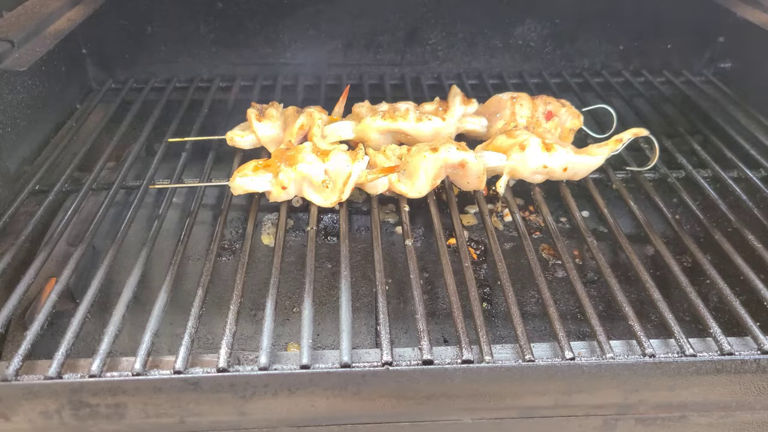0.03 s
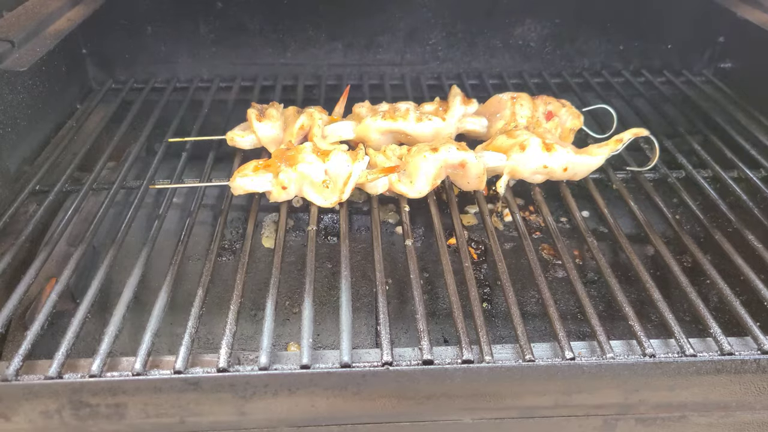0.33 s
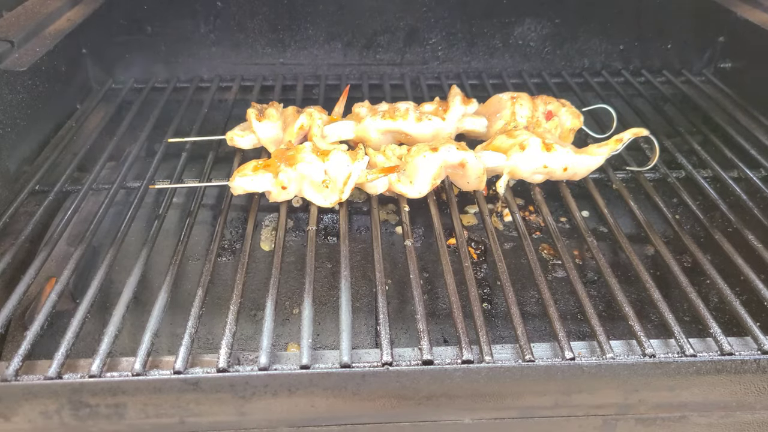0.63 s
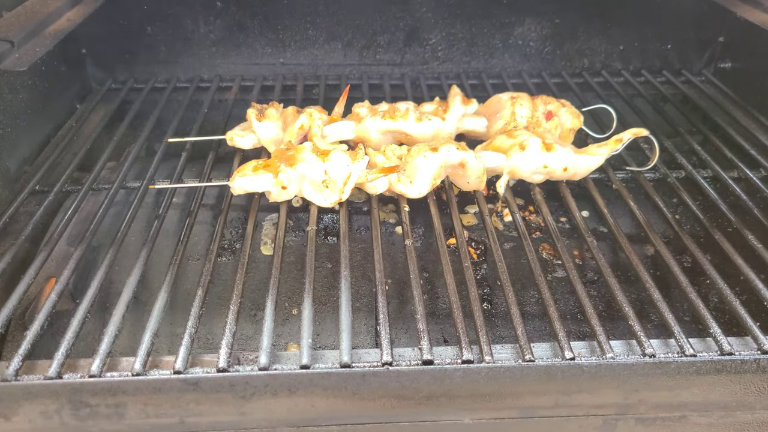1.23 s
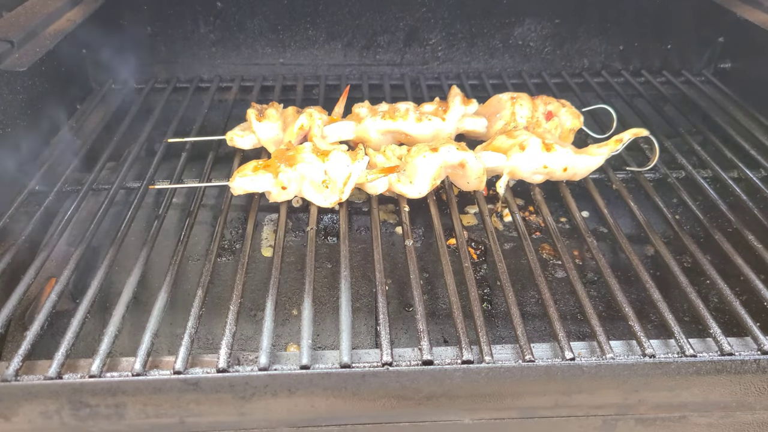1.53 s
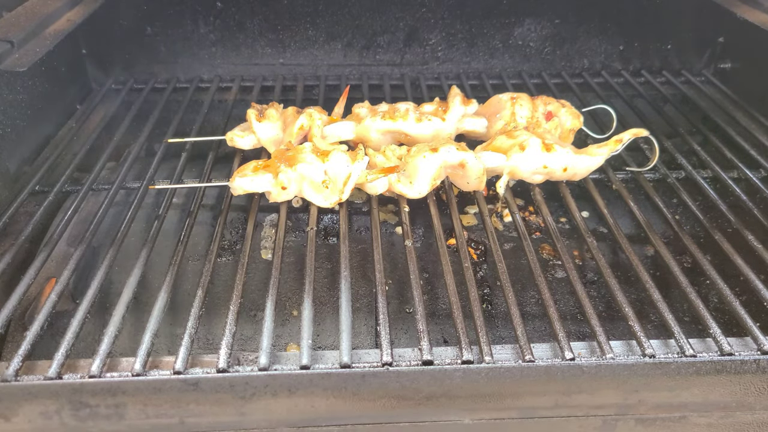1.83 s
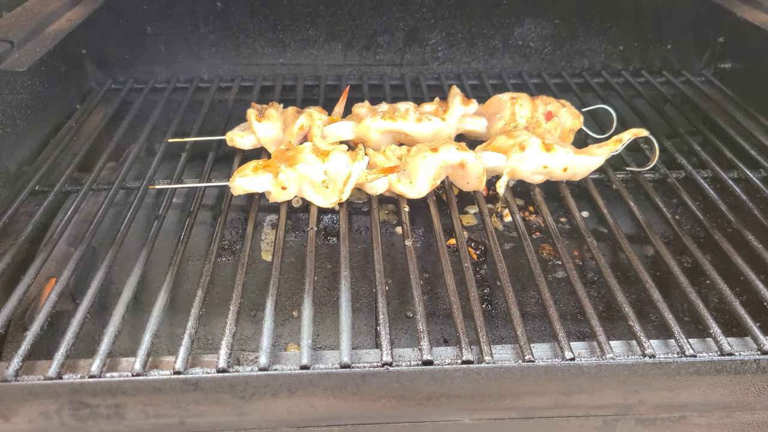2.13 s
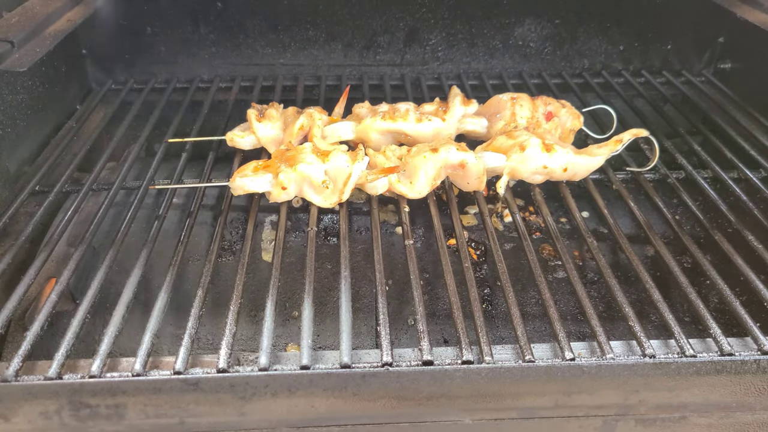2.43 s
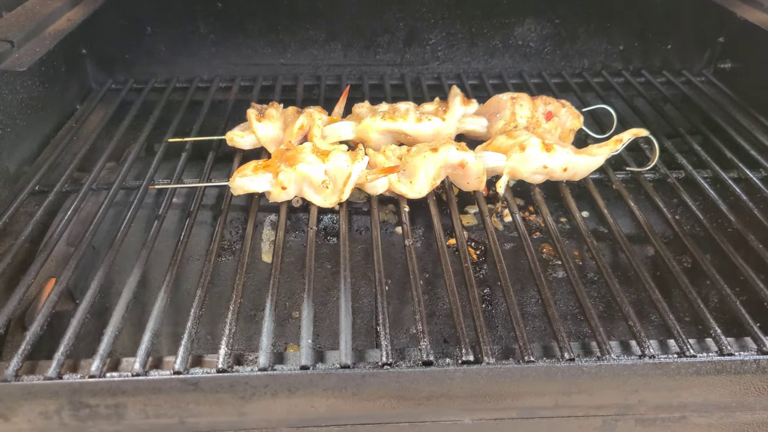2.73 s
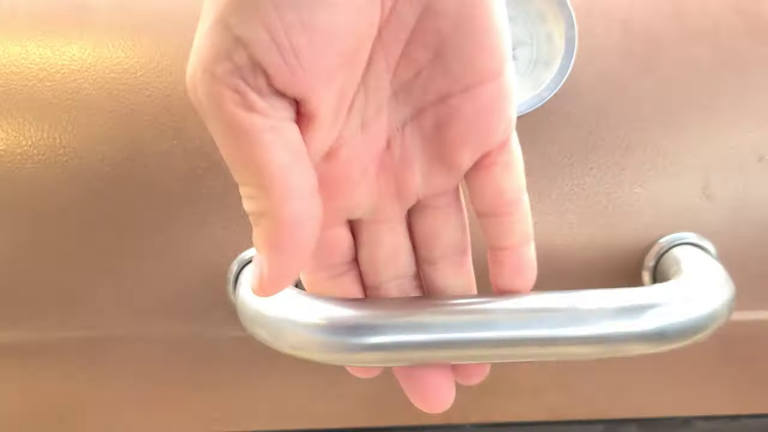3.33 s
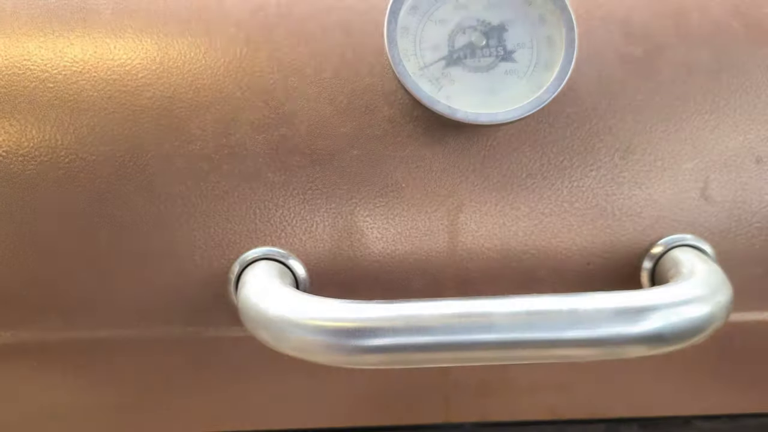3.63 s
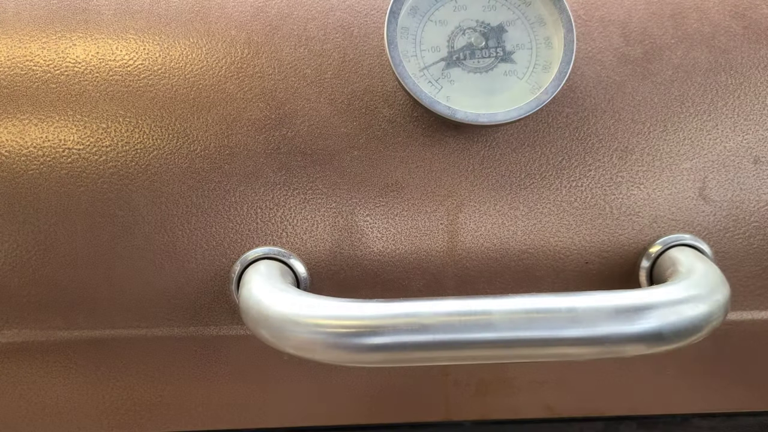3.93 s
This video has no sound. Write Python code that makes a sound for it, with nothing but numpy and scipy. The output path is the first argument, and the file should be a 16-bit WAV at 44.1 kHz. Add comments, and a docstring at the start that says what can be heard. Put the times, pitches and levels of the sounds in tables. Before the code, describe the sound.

Meat skewers sizzle and spit on an open grill, heard up close over the low, hollow roar of a fan-blown fire. Something knocks inside, then the steel lid shuts with a short rattling clang, muffling the sizzle.

```python
"""Skewers sizzling on an open barrel grill, heard from close by on a stereo microphone.
Juice boils in tiny bursting bubbles and fat spits; behind them the fan-blown fire roars in the
hollow body, something knocks inside and air buffets the microphone. The steel lid swings down,
muffling the sizzle and lowering the hollow note, then lands with a short rattling clang."""
import sys
import numpy as np
from scipy import signal
from scipy.fft import rfft, irfft
from scipy.io import wavfile

SR = 44100
rng = np.random.default_rng(int(sys.argv[2]) if len(sys.argv) > 2 else 0)


def wav_record(signal):
    """Record a signal, one row per channel, as 16-bit PCM in the file named by sys.argv[1]."""
    frames = np.transpose(np.atleast_2d(signal))
    bounded = np.clip(frames, -1, 1)
    # unit amplitude maps onto the largest positive 16-bit level
    quanta = np.round(bounded * 32767).astype(np.int16)
    wavfile.write(sys.argv[1], SR, quanta)


N = 176400
T = np.arange(N) / SR


def amp(db):
    """Decibels to gain."""
    return 10 ** (np.asarray(db) / 20)


def unit(x):
    """Scales to rms 1."""
    return x / np.sqrt(np.mean(abs(x) ** 2) + 1e-20)


def read(points, hz):
    """Reads a table on a log-frequency axis."""
    f, value = np.transpose(points)
    return np.interp(np.log(hz + 1), np.log(f + 1), value)


def curve(points):
    """Reads a control curve at every sample."""
    return np.interp(T, *np.transpose(points))


def add(mix, s, sound):
    """Mixes a sound into a stereo track at time s."""
    part = mix[:, round(s * SR):][:, :sound.shape[-1]]
    part += sound[..., :part.shape[1]]


def colour(x, points):
    """Gives a signal a spectrum, at rms 1."""
    size = x.shape[-1]
    gain = amp(read(points, np.fft.rfftfreq(size, 1 / SR)))
    return unit(irfft(rfft(x) * gain, size))


def drift(hz):
    """Slow random wander up to about hz, at rms 1."""
    f = np.fft.rfftfreq(N, 1 / SR)
    return unit(irfft(rfft(rng.standard_normal(N)) * (f > 0) * np.exp(-(f / hz) ** 2), N))


def resonate(x, hz, width):
    """A steep resonance that follows hz, at rms 1."""
    turn = np.exp(2j * np.pi * np.cumsum(hz * np.ones(N)) / SR)
    r = np.exp(-np.pi * abs(width) / SR)
    return unit((turn * signal.lfilter([(1 - r) ** 2], [1, -2 * r, r * r], x / turn)).real)


def chime(modes, t, spread_rad=.6):
    """Dying steel modes, each reaching left and right at slightly different phases."""
    return sum(amp(db - 60 * t / t60)
               * np.sin(2 * np.pi * (hz * t + rng.random()) + spread_rad * rng.standard_normal((2, 1)))
               for hz, db, t60 in modes)


# likeness of the two channels (frequency [Hz], likeness [ratio, clipped to 0-0.995 in use])
MIC_LIKENESS = [(60,0.5),(90,1),(115,2.8),(290,1.3),(400,0.73),(490,-0.4),(700,1.5),(1000,0.4),(1350,0.9),(1900,0.3245),(15000,0.14)]
# phase between them (frequency [Hz], left lead [rad])
MIC_LEAD = [(60,0),(200,.2),(430,.7),(700,.9),(1000,1.3),(1400,1.5),(2400,2),(16000,5)]
# their balance (frequency [Hz], left minus right [dB])
MIC_BALANCE = [(60,1.5),(300,0),(1290,0.9),(4400,0.5),(8120,2.5),(15000,7.5)]
def mic_noise(size):
    """White noise as the two microphone ports pick it up."""
    f = np.fft.rfftfreq(size, 1 / SR)
    left, other = rfft(rng.standard_normal((2, size)))
    same = np.clip(read(MIC_LIKENESS, f), 0, .995)
    side = amp(read(MIC_BALANCE, f) / 2)
    right = (same * left + np.sqrt(1 - same ** 2) * other) * np.exp(-1j * read(MIC_LEAD, f))
    return irfft(np.array([left * side, right / side]), size)


def band(size, hz, octaves):
    """Stereo noise around hz, at rms 1."""
    f = np.fft.rfftfreq(size, 1 / SR)
    bell = np.exp(-.5 * (np.log2((f + 1) / hz) / octaves) ** 2)
    return unit(irfft(rfft(mic_noise(size)) * bell, size))


# soft bumps on the microphone (time [s], level [dB], frequency [Hz])
BUMPS = [(.393,-14,105),(3.503,-16,87)]
def mic_bumps(width_s=.0091):
    """Each bump on the microphone is a single low swing of pressure."""
    return sum(amp(db) * np.sin(2 * np.pi * hz * (s - T)) * np.exp(-((T - s) / width_s) ** 2)
               for s, db, hz in BUMPS)


# puffs on the microphone (time [s], length [s], level [dB])
PUFFS = [(0.709,0.093,-26),(1.75,0.076,-21.5),(2.897,.08,-15),(3.467,0.053,-23),(3.718,0.051,-27.5)]
# rumble of air at the ports (frequency [Hz], relative density [dB])
RUMBLE_SPECTRUM = [(12,-35),(22,-5),(65,14),(115,6),(200,-10),(16000,-100)]
# its swell (time [s], level [dB])
RUMBLE_LEVEL = [(0,-29.5),(1.2,-34),(2.5,-23),(3.2,-32.5),(3.7,-39),(4,-35)]
def mic_buffets(puff_hz=80, left_db=1):
    """Air right on the microphone: low rumble and soft puffs, different at each port."""
    swell = sum(amp(db) * np.exp(-(2 * (T - s) / length) ** 2) for s, length, db in PUFFS)
    rumble = amp(curve(RUMBLE_LEVEL)) * colour(rng.standard_normal((2, N)), RUMBLE_SPECTRUM)
    puffs = swell * resonate(mic_noise(N), puff_hz, width=45)
    return (rumble + puffs) * amp([[left_db], [-left_db]])


# the fire behind the shut lid (frequency [Hz], relative density [dB])
DRONE_SPECTRUM = [(170,-16),(210,-3),(236,10.5),(265,-13),(325,-6.5),(360,4),(410,-13),(490,-3),(640,-11.5),(850,-7),(1100,-15),(1550,-13.5),(2000,-21.5),(16000,-43.5)]
# its rise as the lid shuts (time [s], level [dB])
DRONE_LEVEL = [(3.1,-54),(3.4,-38.5),(3.9,-37.5),(4,-32)]
def shut_drone():
    """Once the lid is down, the fire drones dully through the steel."""
    return amp(curve(DRONE_LEVEL)) * colour(mic_noise(N), DRONE_SPECTRUM)


# the hollow note, sinking as the lid comes down (time [s], share of open pitch [ratio])
HOLLOW_PITCH = [(0,0.89),(.6,1.085),(1.25,0.99),(1.47,1.015),(1.7,.96),(1.88,1.036),(2.25,1.04),(2.5,0.94),(2.8,1.02),(3,0.99),(3.1,.98),(3.33,0.78)]
# open barrel resonances (frequency [Hz], width [Hz], relative level [dB], following of the lid [0-1])
BARREL_MODES = [(180.1,57.7,-.5,1),(238.1,18,-6.5,0.1),(280.5,47,-13,0.28),(353.4,75,-14.5,0)]
# the fire's low roar (time [s], relative level [dB])
FIRE_LEVEL = [(0,-17),(.3,-26.5),(.55,-27),(.8,-28.5),(1.1,-20.5),(1.25,-19.5),(1.45,-17.5),(1.75,-16),(1.92,-17.5),(2.3,-18.5),(2.55,-13.5),(2.85,-16),(3.05,-16),(3.27,-18),(3.42,-35),(3.9,-51.5),(4,-29)]
def fire(gain_db=-.5, waver=.042, waver_hz=5):
    """Down in the barrel, flame turbulence booms in the hollow body's resonances."""
    bend = curve(HOLLOW_PITCH) - 1 + waver * drift(waver_hz)
    roar = sum(amp(db) * resonate(mic_noise(N), hz * (1 + follow * bend), width)
               for hz, width, db, follow in BARREL_MODES)
    return amp(gain_db + curve(FIRE_LEVEL)) * unit(roar)


# duct resonances, lid open (frequency [Hz], width [Hz], relative level [dB])
DUCT_MODES = [(391.9,41.7,4),(595,27,-11),(661,26,-12.5),(729,61,-14.5),(797,23,-12.5)]
# rush of fan air (frequency [Hz], relative density [dB])
RUSH_SPECTRUM = [(100,-14.5),(330,0.5),(490,-6),(680,-10),(1050,-6.5),(1350,2.5),(1700,-11.5),(2300,-17.5),(2900,-16),(4000,-27),(8000,-28),(16000,-60)]
# its strength at the microphone (time [s], relative level [dB])
RUSH_LEVEL = [(0,-32),(.4,-35),(.9,-34),(1.5,-32),(2.3,-32),(3.05,-31),(3.22,-34.5),(3.35,-37.5),(3.62,-65)]
def fan(rush_db=3, duct_db=-1.5, flutter_db=1.83, flutter_hz=18, follow=.24):
    """Fan air rushes through the grill's ducts, whose ring bends a little with the hollow note."""
    pitch = 1 + follow * (curve(HOLLOW_PITCH) - 1)
    ducts = sum(amp(db) * resonate(mic_noise(N), hz * pitch, width) for hz, width, db in DUCT_MODES)
    rush = amp(rush_db) * colour(mic_noise(N), RUSH_SPECTRUM) + amp(duct_db) * ducts
    return rush * amp(curve(RUSH_LEVEL) + flutter_db * drift(flutter_hz))


# knocks inside the barrel (time [s], relative level [dB])
KNOCKS = [(1.076,1),(1.083,-3),(1.097,-6),(1.431,-12)]
# their noisy body (frequency [Hz], relative density [dB])
KNOCK_SPECTRUM = [(100,-27),(300,5.5),(450,12),(800,-9),(1400,-4),(2000,1),(2400,-5),(4300,-12.5),(7000,-42),(16000,-45)]
# their ring (frequency [Hz], relative level [dB], t60 [s])
KNOCK_MODES = [(436,-30,.13),(1880,-30,.07),(2110,-23,0.031),(2400,-32,.08)]
def knocks(body_db=-22, t60_s=.25, click_db=2, click_s=.0018, rise_s=.0004):
    """Something small drops and bounces inside the barrel."""
    out, t = np.zeros((2, N)), np.arange(16384) / SR
    decay = amp(-60 * t / t60_s) + amp(click_db) * np.exp(-t / click_s)
    for s, db in KNOCKS:
        body = amp(body_db) * decay * colour(mic_noise(len(t)), KNOCK_SPECTRUM)
        add(out, s, amp(db) * (body + chime(KNOCK_MODES, t)) * (1 - np.exp(-t / rise_s)))
    return out


# ring of the hot grate (frequency [Hz], level [dB], t60 [s])
GRATE_MODES = [(2250,-43,.12),(2700,-43,.12),(3050,-42,.09),(3380,-37,.13),(3850,-43,.1)]
# ring of the steel handle (frequency [Hz], level [dB], t60 [s])
HANDLE_MODES = [(1174,-37,.4),(1572,-43,.35),(1965,-42,.26),(3930,-46,.36),(4721,-55,.36),(7504,-60,.4)]
# light scrapes on the shut lid (time [s], length [s], level [dB], centre [Hz])
SCRAPES = [(3.408,0.072,-36.5,4400),(3.558,0.11,-48,2800),(3.746,0.02,-41,5750)]
def small_metal(tick_s=1.432, release_s=3.514, rise_s=.0053):
    """The hot grate ticks; the shut lid scrapes, and its handle rings as the hand slips off."""
    out, t = np.zeros((2, N)), np.arange(32768) / SR
    add(out, tick_s, chime(GRATE_MODES, t))
    add(out, release_s, chime(HANDLE_MODES, t) * (1 - np.exp(-t / rise_s)))
    for s, length, db, hz in SCRAPES:
        out += amp(db) * np.exp(-(2 * (T - s) / length) ** 2) * band(N, hz, octaves=.92)
    return out


# the rim meets the barrel (time [s], relative level [dB], air push level [dB], push frequency [Hz])
RIM_CONTACTS = [(3.377,-1.5,-6,205),(3.383,-0.5,-6.5,336),(3.399,-13,-32,300),(3.412,-7.5,-38,300),(3.494,-19,-36,150)]
# the lid's clear notes (frequency [Hz], relative level [dB], t60 [s])
LID_MODES = [(267,-16,.13),(350,-23,.15),(506,-25,.2),(592,-23,.3),(657,-23,.4),(743,-21.5,.4),(797,-19,.27),(937,-27,.16),(1233,-31,.22),(1319,-24,.12),(1712,-39,.38),(2290,-27,.14)]
# dense sheet-metal ring (frequency [Hz], relative density [dB])
SHEET_SPECTRUM = [(50,-1),(200,4.5),(480,0),(750,-4.5),(950,-12),(1300,0.5),(1900,-11.5),(2600,-10),(4000,-15.5),(8500,-26.5),(16000,-43)]
# its decay (frequency [Hz], t60 [s])
SHEET_T60 = [(100,0.53),(700,0.52),(1500,0.26),(3000,0.24),(8000,0.15)]
def lid(sheet_db=-17, modes_db=-2.5, crack_db=4, crack_s=.0035, push_s=.005, rise_s=.0004):
    """Close by, the rim lands and chatters: each contact pushes air, cracks and rings the steel shell."""
    out, t = np.zeros((2, N)), np.arange(32768) / SR
    for s, db, push_db, push_hz in RIM_CONTACTS:
        sheet = colour(mic_noise(len(t)), SHEET_SPECTRUM)
        f, age, bands = signal.stft(sheet, SR, nperseg=256)
        decay = amp(-60 * age / read(SHEET_T60, f)[:, None])  # the treble dies first
        ring = signal.istft(bands * decay, SR, nperseg=256)[1][:, :len(t)]
        crack = amp(crack_db) * sheet * np.exp(-t / crack_s)
        clang = amp(sheet_db) * (ring + crack) + amp(modes_db) * chime(LID_MODES, t)
        push = amp(push_db) * np.sin(2 * np.pi * push_hz * t) * np.exp(-(t / push_s) ** 2)
        add(out, s, amp(db) * clang * (1 - np.exp(-t / rise_s)) + push)
    return out


# spits of fat (time [s], level [dB], centre [Hz], width [octaves])
SPITS = [(.1366,-26,12100,.12),(.32,-30,12100,.2),(.7075,-20.5,7000,1.4),(.7075,-22,1700,.6),(1.502,-32,8200,.25),(1.774,-26.5,11300,.25),(1.994,-30,7000,1),(2.232,-28.5,12600,.4),(2.287,-25,4200,.8),(2.69,-23,13400,.6),(2.9205,-15.5,3000,.35),(2.9205,-20,10000,1),(2.9425,-16.5,7000,1.6),(2.9425,-18,1500,.55)]
def spits(burst_s=.003, echo_s=.016, echo_db=-18):
    """Drops of fat burst near the microphone and echo briefly in the barrel."""
    out, t = np.zeros((2, N)), np.arange(4096) / SR
    decay = np.exp(-t / burst_s) + amp(echo_db) * np.exp(-t / echo_s)
    for s, db, hz, octaves in SPITS:
        add(out, s, amp(db) * decay * band(len(t), hz, octaves))
    return out


# the sizzle at close range (frequency [Hz], relative density [dB])
SIZZLE_SPECTRUM = [(100,-40),(1200,-29),(2900,2.5),(4800,0),(6300,-0.5),(7400,-2.5),(8700,1.5),(10300,-1.5),(12400,2.5),(16000,-2.5)]
# its strength on the grate (time [s], relative level [dB])
SIZZLE_LEVEL = [(0,-43.5),(.25,-47),(.7,-43.5),(1.09,-40.5),(1.7,-43),(1.8,-37),(2.1,-40.5),(2.65,-35),(2.95,-33)]
# the lid coming between skewers and microphone (time [s], gain [dB])
LID_SHADE = [(0,3.5),(3.05,-6.5),(3.2,-16.5),(3.35,-21),(3.6,-29.5),(4,-33)]
def sizzle(hiss_db=5.5, crackle_db=-6.5, flicker_db=1.64, flicker_hz=35,
           bubbles_per_s=590, spread_db=4.5, burst_s=.0008):
    """Juice boils on the skewers, close up: a fine hiss with countless tiny bursting bubbles."""
    crackle, t = np.zeros((2, N)), np.arange(512) / SR
    centres_hz = np.geomspace(3500, 15000, num=20)
    for hz in centres_hz:
        sizes = amp(spread_db * np.minimum(rng.exponential(1, N), 4.5))
        bursts = sizes * (rng.random(N) < bubbles_per_s / len(centres_hz) / SR)
        pop = band(len(t), hz, octaves=.86) * np.exp(-t / burst_s)
        crackle += signal.oaconvolve(bursts[None], pop, axes=1)[:, :N]
    hiss = amp(hiss_db + flicker_db * drift(flicker_hz)) * colour(mic_noise(N), SIZZLE_SPECTRUM)
    boiling = hiss + amp(crackle_db) * colour(crackle, SIZZLE_SPECTRUM)
    return boiling * amp(curve(SIZZLE_LEVEL) + curve(LID_SHADE))


def scene():
    """Everything heard from one spot close beside the grill."""
    return (fire() + fan() + mic_buffets() + sizzle() + spits()
            + knocks() + lid() + small_metal() + shut_drone() + mic_bumps())


def record(dry):
    """The recorder clips at full scale and cuts the highest treble."""
    lowpass = signal.firwin(511, cutoff=15950, window=("kaiser", 9), fs=SR)
    return signal.oaconvolve(np.clip(dry, -1, 1), lowpass[None], "same")


dry = scene()
out = record(dry)
wav_record(out)
```